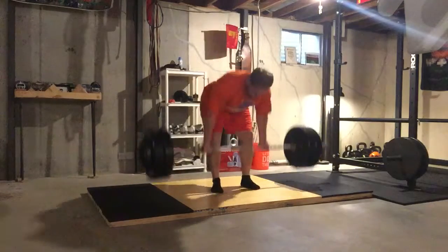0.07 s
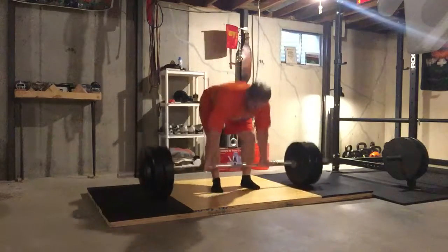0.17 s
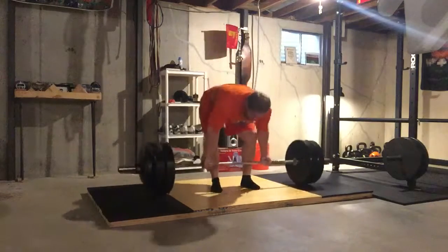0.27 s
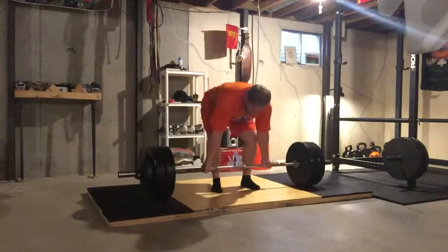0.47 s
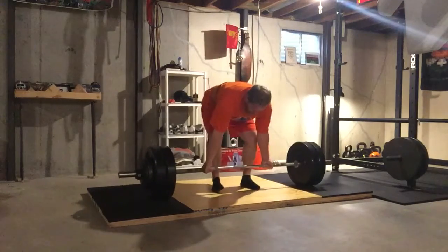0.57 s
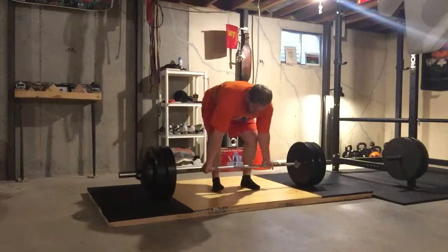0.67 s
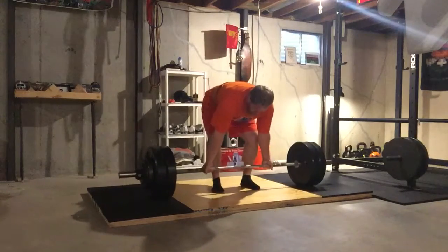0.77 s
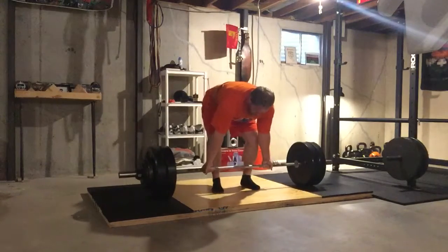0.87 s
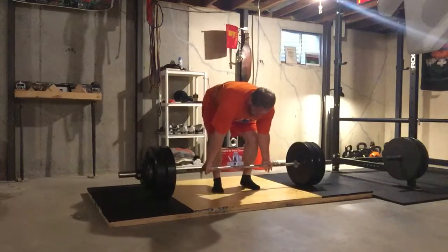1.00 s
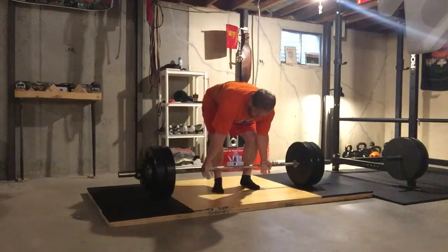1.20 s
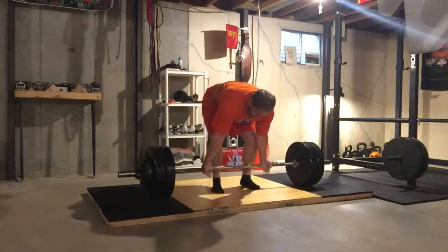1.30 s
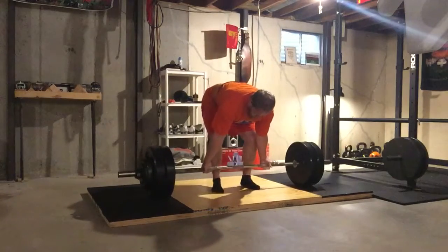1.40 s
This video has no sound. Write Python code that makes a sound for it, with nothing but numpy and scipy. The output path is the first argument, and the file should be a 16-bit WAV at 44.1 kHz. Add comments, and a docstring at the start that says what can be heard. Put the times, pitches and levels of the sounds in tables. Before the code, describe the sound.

A loaded barbell rattles as it drops, then lands on a wooden platform at about 0.25 seconds with a deep boom and a loud iron clang that overloads the microphone. It bounces with a smaller clash near 0.45 seconds. The ringing fades in the basement's echo as the plates roll with a soft rumble, with light clinks around 0.9, 1.05 and 1.4 seconds, over a faint electrical hum.

```python
"""Loose steel sleeves rattle as a loaded barbell falls toward a wooden lifting platform.
The platform booms and the iron plates clash, bounce once and rumble to rest.
Each hit is a quick burst of tiny contacts followed by the ringing of wood or metal.
The concrete basement echoes over a mains hum, and the landing overloads the microphone."""
import sys
import numpy as np
from scipy import signal
from scipy.fft import rfft, irfft
from scipy.io import wavfile

SR = 44100
rng = np.random.default_rng(int(sys.argv[2]) if len(sys.argv) > 2 else 0)


def log_audio(samples):
    """Write samples as a 16-bit WAV file to the path given in sys.argv[1]."""
    # one column per channel
    frames = np.atleast_2d(samples).T
    # limit to full scale, then quantise
    limited = np.clip(frames, -1, 1)
    pcm = np.round(limited * 32767).astype(np.int16)
    wavfile.write(sys.argv[1], SR, pcm)


N = 63945
T = np.arange(N) / SR


def amp(db):
    """Turns decibels into a gain."""
    return 10 ** (np.asarray(db) / 20)


def unit(x):
    """Scales a sound to a total energy of 1."""
    return x / np.sqrt(np.sum(x ** 2) + 1e-20)


def read(points, hz):
    """Looks up a value between a table's rows, on a log-frequency axis."""
    f, value = np.transpose(points)
    return np.interp(np.log(hz + 1), np.log(f + 1), value)


def add(mix, s, sound):
    """Mixes a sound in at s seconds."""
    part = mix[max(round(s * SR), 0):]
    part += sound[:len(part)]


def conv(a, b):
    """Filters one sound with another (convolution), cut to the scene's length."""
    return signal.fftconvolve(a, b)[:N]


def colour(points, tilt=0, low_hz=15):
    """A filter with the table's tone, brightened by tilt dB per octave, with less bass below low_hz."""
    hz = abs(np.fft.fftfreq(4096, 1 / SR)) + 1
    gain = amp(read(points, hz) + tilt * np.log2(hz / 1000))
    gain /= np.hypot(1, (low_hz / hz) ** 2)
    log_gain = np.log(np.maximum(gain / gain.max(), 1e-5))
    spectrum = np.exp(np.conj(signal.hilbert(log_gain)))  # minimum phase: no sound before the hit
    return unit(np.fft.ifft(spectrum).real[:2048])


def ring(modes, flicker=0.7):
    """A struck object's own tones die away (by 60 dB in t60), flickering as echoes pile up."""
    knots = np.arange(0, T[-1] + 0.1, 1 / 75)  # 75 random flicker values a second
    out = np.zeros(N)
    for hz, db, t60 in modes:
        phase = 2 * np.pi * (hz * T + rng.random())
        wobble = flicker * rng.standard_normal((2, len(knots)))
        sine_wobble, cosine_wobble = (np.interp(T, knots, row) for row in wobble)
        tone = (1 + sine_wobble) * np.sin(phase) + cosine_wobble * np.cos(phase)
        out += amp(db) * np.exp(-np.log(1000) * T / t60) * tone
    return unit(out)


def fade(x, t60s):
    """Lets each frequency die away at its own speed."""
    hz, t, spectrum = signal.stft(x, SR, nperseg=256)
    decay = np.exp(-np.log(1000) * t / read(t60s, hz)[:, None])
    return signal.istft(spectrum * decay, SR, nperseg=256)[1][:N]


def strike(body, decay_s, echo_db):
    """A dying burst of tiny contacts and its echo off the concrete, both in the struck body's tone."""
    # how long the room echoes: f/Hz, t60/s
    room_t60 = [(50, .9), (150, 1), (400, 0.86), (1200, 0.84), (3000, 0.71), (4500, 0.62), (6500, .47),
                (10000, .37), (13000, .3), (16000, .24)]
    contacts_per_s, build_s = 7000, 0.001 + decay_s / 2
    contacts = rng.standard_normal(N) * (rng.random(N) < contacts_per_s / SR)
    burst = unit(contacts * np.exp(-T / decay_s))
    echo = fade(rng.standard_normal(N), room_t60) * (1 - np.exp(-T / build_s))
    return unit(conv(burst, body)) + amp(echo_db) * unit(conv(echo, body))


def basement():
    """The mains hums steadily over a low rush of air."""
    # tone of the air: f/Hz, relative level/dB
    air_colour = [(20, -33), (40, -17), (65, -12), (120, -3.5), (190, -9.5), (400, -10.5), (600, -23),
                  (1200, -26.5), (2000, -40.5), (5000, -50), (15000, -60.5)]
    # tones in the hum: f/Hz, level/dB
    hum_tones = [(120, -52), (240, -50), (360, -60), (480, -62), (829, -64)]
    air_gain = amp(read(air_colour, np.fft.rfftfreq(N, 1 / SR)))
    air = irfft(rfft(rng.standard_normal(N)) * air_gain, N)
    hum = sum(amp(db) * np.sqrt(2) * np.sin(2 * np.pi * (hz * T + rng.random())) for hz, db in hum_tones)
    return amp(-47.5) * air / air.std() + hum


def roll():
    """The plates rumble as they roll a short way over the mats."""
    # tone of the rumble: f/Hz, relative level/dB
    rumble_colour = [(20, -17), (57, 1.5), (95, -4.5), (160, -11.5), (500, -20), (1200, -17.5), (1900, -29),
                     (4000, -39.5), (15000, -64)]
    # loudness as the bar rolls to rest: t/s, level/dB
    loudness = [(.6, -66), (.75, -43), (.9, -45), (1.0, -46.5), (1.08, -42), (1.17, -47), (1.26, -53),
                (1.45, -51.5)]
    rumble = conv(rng.standard_normal(N), colour(rumble_colour))
    return rumble * amp(np.interp(T, *np.transpose(loudness)))


def sleeves():
    """The loose steel sleeves that hold the plates knock on the bar and ring."""
    # knocks: t/s, level/dB, brightness/(dB per octave), chatter decay/s, relative ring level/dB
    rattles = [(0, -6.5, -1.5, .03, 0), (0.017, 0.5, -2, .018, -5), (.042, 8, 1.5, 0.011, 1),
               (.087, -3.5, -5, .008, -3), (0.111, -6, -0.5, .01, 2.5), (0.141, -5.5, 4, .15, -29),
               (1.05, -24, -9, 0.037, -12), (1.432, -21, -9, .03, -12.5)]
    # tone of a knock: f/Hz, relative level/dB
    knock_colour = [(200, -13), (700, -9.5), (1400, 2.5), (2100, -5), (3100, -2), (4500, -9.5), (5700, -7),
                    (8000, -18.5), (9300, -9), (10800, -27), (15000, -25.5)]
    # ringing tones of the sleeves: f/Hz, relative level/dB, t60/s
    sleeve_modes = [(292, -7, .35), (1405, 0, .6), (1465, -3, .5), (2150, -12, .7), (2869, -6, .5),
                    (2985, -3, .45), (3014, -2, .48), (3062, -5, .55), (4947, -14, .8), (5400, -11, .65),
                    (5600, -13, .6), (9190, -9, .16), (9320, -7, .15)]
    out = np.zeros(N)
    for s, db, tilt, decay_s, ring_db in rattles:
        knock = strike(colour(knock_colour, tilt, low_hz=180), decay_s, echo_db=0.5)
        add(out, s, amp(db) * (knock + amp(ring_db) * ring(sleeve_modes)))
    return out


def platform():
    """The weight thumps on rubber and plywood; the boards and bar boom after it."""
    # blows: t/s, level/dB, brightness/(dB per octave), thump decay/s, relative boom level/dB
    thuds = [(0.2447, 20.5, 0, 0.026, -4.5), (.268, 21.5, 0, 0.038, -2), (0.352, 6.5, -7.5, 0.04, -5),
             (0.466, 10.5, -2, 0.063, -2)]
    # tone of a thump: f/Hz, relative level/dB
    thump_colour = [(20, -15.5), (48, -1.5), (85, -2), (125, -5), (200, -2.5), (290, 2.5), (480, -4.5),
                    (650, -11), (1150, -7), (2000, -21), (5000, -36.5), (15000, -63)]
    # deep tones of the boards and bar: f/Hz, relative level/dB, t60/s
    boom_modes = [(53.4, -11.5, 0.92), (62.8, -11.5, 0.73), (82.4, 0, .52), (148.6, -3.5, 0.34),
                  (176, -6.5, 0.33), (234.5, -11, .7), (278.5, -5, .85), (289, 2.5, .34),
                  (405.4, -0.5, 0.27), (489.6, -2, 0.37), (560, -10, 0.33), (855, -12, .5)]
    boom_rise = 1 - np.exp(-T / 0.0032)
    out = np.zeros(N)
    for s, db, tilt, decay_s, boom_db in thuds:
        thump = strike(colour(thump_colour, tilt, low_hz=40.5), decay_s, echo_db=-5.5)
        boom = amp(boom_db) * ring(boom_modes, flicker=0.14) * boom_rise
        add(out, s, amp(db) * (thump + boom))
    return out


def plates():
    """Iron plates slap each other and the bar: chatter, strong ringing tones and many faint ones. The last two
    clashes, near 0.88 s, are a loose sleeve clinking on the bar, sounded the same way."""
    # clashes: t/s, level/dB, brightness/(dB per octave), chatter decay/s,
    # then the relative levels of room echo/dB, plate ring/dB, bar ring/dB
    clashes = [(0.2493, 24, 1.5, 0.026, -13, -9.5, -23.5), (.261, 23, -4.5, 0.018, -4, -9.5, -20),
               (0.289, 9.5, 2, 0.0076, -6.5, -10, -17.5), (.42, 8.5, -2, 0.0077, -1, -20.5, -4),
               (0.461, 6.5, -2, 0.0027, 6.5, -24, 4), (.466, 13.5, -0.3, 0.0055, -0.5, -20, -3),
               (.473, 12.5, 1.5, 0.0081, -2, -14, -0.5), (0.88, -18.5, 7, 0.0089, 6, -22.5, -3),
               (.887, -9.5, -2, 0.02, 3.5, -20, -10)]
    # tone of a clash: f/Hz, relative level/dB
    clash_colour = [(290, -31), (500, -10.5), (1090, -11), (1450, -7), (2010, -6), (3100, -2), (3740, -6.5),
                    (6930, -7.5), (8120, -17.5), (8980, -11.5), (10500, -19.5), (15500, -24)]
    # strong tones of the plates: f/Hz, relative level/dB
    plate_tones = [(1346, -31.5), (2396, -32), (2853, -36.5), (3192, -34.5), (4005, -29.5), (4387, -29.5),
                   (4667, -39), (5136, -31), (5512, -35), (5706, -34), (6164, -36), (6804, -41.5),
                   (7176, -56.5), (8796, -40)]
    # how long the plates ring: f/Hz, t60/s
    plate_t60 = [(500, 0.57), (1500, 0.87), (3000, .8), (4500, 0.38), (6500, 0.34), (9000, 0.58),
                 (12000, .35), (15000, .3)]
    # tones of the bending bar: f/Hz, relative level/dB, t60/s
    bar_modes = [(1416, -2, .55), (1445, -7, .55), (2579, -7, .65), (2853, -3, .58), (2915, -5, .68),
                 (3120, -7, .8), (3330, -19, 1.2), (3973, -2, .52), (4400, -9, .66), (4845, -6, .68),
                 (5276, -2, .48), (5690, -8, .62), (6180, -1.5, .55), (6648, -8, .64), (7176, -1, .5),
                 (7682, -8, .44), (8010, -9, .32), (8726, -8, .33), (9259, -8, .35), (9851, -13, .36),
                 (13329, -17, .27)]
    ring_tilt = 0.68  # dB per octave, brightens the plates' ring
    plate_modes = [(hz, db + ring_tilt * np.log2(hz), read(plate_t60, hz)) for hz, db in plate_tones]
    faint_tones_per_hz, shimmer_db = 0.02, -5.5
    bins = N // 2 + 1
    has_tone = rng.random(bins) < faint_tones_per_hz * SR / N
    out = np.zeros(N)
    for s, db, tilt, decay_s, echo_db, plate_db, bar_db in clashes:
        body = colour(clash_colour, tilt, low_hz=490)
        faint_tones = irfft(has_tone * np.exp(2j * np.pi * rng.random(bins)), N)
        shimmer = amp(shimmer_db) * unit(conv(fade(faint_tones, plate_t60), body))
        ringing = amp(plate_db) * ring(plate_modes) + amp(bar_db) * ring(bar_modes) + shimmer
        ring_rise = 1 - np.exp(-2 * T / decay_s)
        chatter = strike(body, decay_s, echo_db)
        add(out, s, amp(db) * (chatter + ringing * ring_rise))
    return out


def scene():
    """Adds the barbell, platform and basement together in one channel."""
    return (plates() + sleeves() + platform() + roll() + basement())[None]


def record(dry):
    """The landing overloads the microphone, flattening the peaks; then the highest treble is cut."""
    hardness, cutoff_hz = 6.3, 15750
    clipped = dry / (1 + abs(dry) ** hardness) ** (1 / hardness)
    low_pass = signal.firwin(511, cutoff_hz, window=("kaiser", 8), fs=SR)
    return signal.oaconvolve(clipped, low_pass[None], "same")


dry = scene()
out = record(dry)
log_audio(out)
```